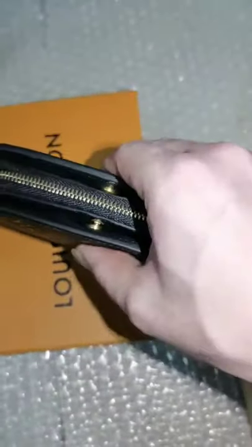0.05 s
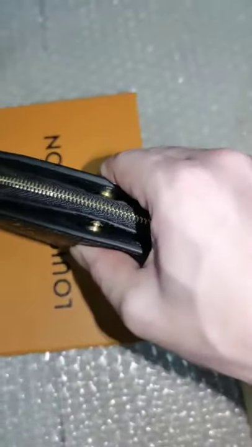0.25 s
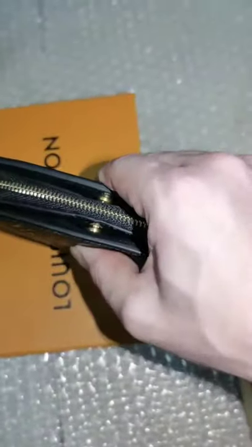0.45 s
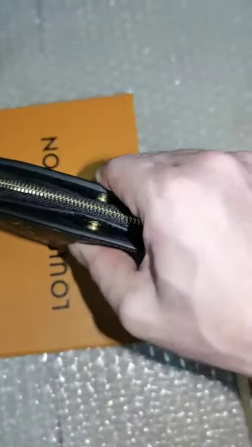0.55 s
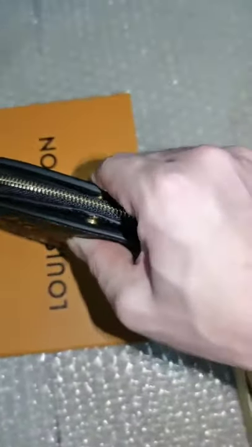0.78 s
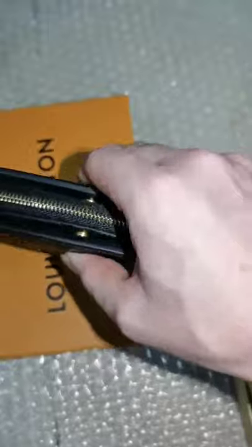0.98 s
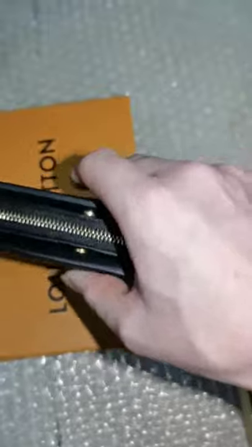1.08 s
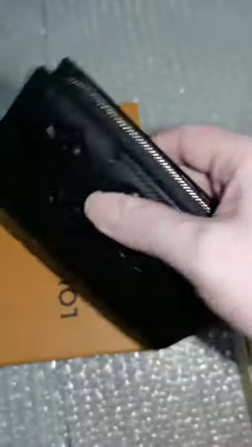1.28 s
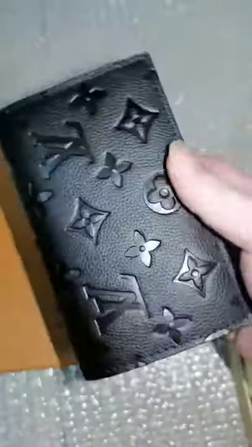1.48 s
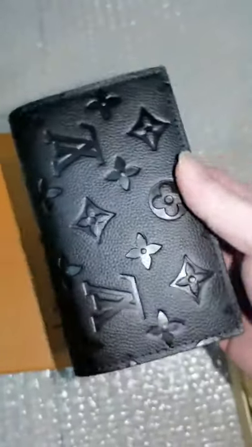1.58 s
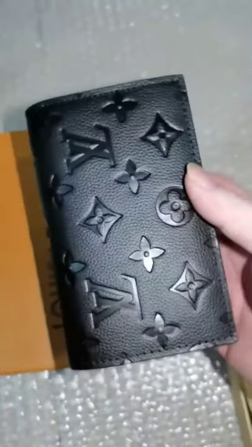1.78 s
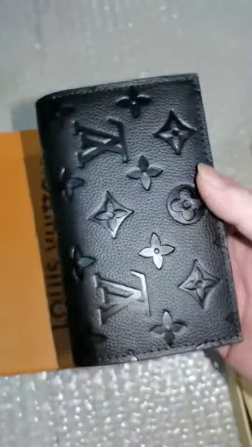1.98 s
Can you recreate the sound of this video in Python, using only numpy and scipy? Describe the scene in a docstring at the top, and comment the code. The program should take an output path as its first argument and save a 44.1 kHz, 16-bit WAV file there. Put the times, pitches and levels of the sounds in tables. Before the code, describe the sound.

Two sharp press studs snap shut in quick succession on a leather purse.

```python
"""Two press studs snap home on a leather purse squeezed shut close to a pair of microphones.
A stud first seats with a dull knock; each snap is a sharp blow that shakes the leather and the socket's
spring and rings the flap, the steel cap and, faintly, the socket. A small bare room rings after them.
The fingers rumble, thump and rustle on the leather, over the room's faint hiss, hum and low drone."""
import sys
import numpy as np
from scipy import signal
from scipy.fft import rfft, irfft, next_fast_len
from scipy.io import wavfile
from scipy.ndimage import map_coordinates

SR = 44100
rng = np.random.default_rng(int(sys.argv[2]) if len(sys.argv) > 2 else 0)


def int16_out(signal):
    """Quantize to a 16-bit WAV file."""
    q = np.round(np.clip(np.atleast_2d(signal).T, -1, 1) * 32767)
    wavfile.write(sys.argv[1], SR, q.astype(np.int16))


N = 90404
TIME_S = np.arange(N) / SR


def press_studs():
    """Each click reaches the left microphone first, returns off table and walls, and rings the socket."""
    # Each row: start in seconds, level in dB, tilt in dB/octave, steel ring, scrape and room gains in dB,
    # room tilt in dB/octave, right microphone's lag in seconds, contact's treble limit in Hz.
    seatings = [(.2517, -13, -3, -34.5, -25, 2.5, -1.1, 0.000078, 2400)]
    snaps = [(0.3644, 6.5, -1.15, -0.5, -6, 3, -1.5, 0.00011, 12000),
             (0.409, 8.5, -0.5, -3.5, -9, -0.5, 3, 0.00013, 15000)]
    # Each row: mode of the metal socket in Hz, level in dB, T60 in seconds.
    socket_modes = [(2239, -60, .45), (2541, -58, .35), (3090, -59, .3), (3467, -56, .3), (3828, -59, .3),
                    (4366, -62, .3)]
    bounce_s, bounce_db, bounce_hz = .0032, -20, 3506  # flap's back wave, inverted, off the table
    bounce = lambda hz: 1 - amp(bounce_db) * delay(bounce_s, hz) / (1 + 1j * hz / bounce_hz)
    out = np.zeros((2, N))
    for events in (seatings, snaps):
        for index, row in enumerate(events):
            start_s, db, tilt_db_oct, steel_db, scrape_db, room_db, room_db_oct, lag_s, contact_hz = row
            t = (np.arange(N) - round(start_s * SR)) / SR
            click = stud_click(t, index, steel_db, scrape_db)
            direct = filtered(click, lambda hz: bounce(hz) * delay(np.array([[0], [lag_s]]), hz))
            tail = amp(room_db) * filtered(room_tail(start_s), lambda hz: tilt(room_db_oct, hz))
            socket = amp(steel_db) * ring(socket_modes, t)
            contact = lambda hz: causal(tilt(tilt_db_oct, hz) / np.sqrt(1 + (hz / contact_hz) ** 6))
            out += amp(db) * filtered(direct + tail + socket, contact)
    return out


def stud_click(t, stud_index, steel_db, scrape_db):
    """A sharp blow at t = 0 and the stud's recoil, with chatter and the ring of flap and cap."""
    # Each row: frequency in Hz, level of the blow in dB.
    blow_spectrum = [(60, -13.5), (200, -4.5), (600, -1), (1500, -4.5), (2700, -3), (3600, -5), (4400, -3),
                     (5000, -10), (5800, -7), (6800, -6), (8600, -8.5), (11000, -6.5), (14000, -4)]
    # Each row: mode of the leather flap in Hz, level in dB struck at the first stud, and at the second.
    flap_levels = [(210, -53, -59.5), (430, -47.5, -64.5), (535, -85, -35.5), (752, -29.5, -34.5),
                   (1195, -46.5, -45.5), (1497, -30.5, -37), (2300, -30.5, -24), (2750, -58, -41),
                   (3800, -49, -33), (4233, -18.5, -34)]
    # Each row: mode of the steel cap in Hz, level in dB, T60 in seconds.
    cap_modes = [(6350, -31.5, 0.011), (6840, -31, 0.0082), (9060, -30.5, 0.01), (9910, -32.5, 0.0047),
                 (10630, -32.5, .012)]
    recoil_s, recoil_db, recoil_hz = .00028, -7, 5500
    recoil = lambda hz: 1 - amp(recoil_db) * delay(recoil_s, hz) / (1 + (hz / recoil_hz) ** 2)
    force = filtered(t == 0, recoil) + scrape_and_chatter(t, scrape_db)
    blow = filtered(force, lambda hz: causal(amp(along(blow_spectrum, hz))))
    flap_t60_s = .018  # at 1 kHz; higher modes die sooner
    flap_modes = [(hz, dbs[stud_index], flap_t60_s * (1000 / hz) ** .45) for hz, *dbs in flap_levels]
    return blow + ring(flap_modes, t) + amp(steel_db) * ring(cap_modes, t)


def scrape_and_chatter(t, scrape_db):
    """The stud scrapes past the spring; after the blow the leather shudders and the spring rattles."""
    rise_s, shudder_t60_s, rattle_t60_s = .00046, .026, .016
    low_cut_hz, split_hz = 1300, 4300
    scrape = amp(scrape_db) * burst((t < 0) * np.exp(-abs(t) / rise_s), scatter=.94)
    shudder = amp(1.5) * burst((t > 0) * amp(-60 * abs(t) / shudder_t60_s), scatter=0)
    rattle = amp(4.5) * burst((t > 0) * amp(-60 * abs(t) / rattle_t60_s), scatter=.94)
    lowpass = lambda hz: 1 / (1 + (hz / split_hz) ** 8)
    chatter = filtered(shudder, lowpass) + filtered(rattle, lambda hz: 1 - lowpass(hz))
    return filtered(scrape + chatter, lambda hz: 1j * hz / (low_cut_hz + 1j * hz))


def spring_clicks():
    """The spring clicks against the stud as it spreads and closes again."""
    # Each row: peak time in seconds, level in dB, centre in Hz, half-length in seconds.
    clicks = [(.3708, -37, 10300, .0012), (.4081, -27, 9000, .0004), (.4131, -25, 10700, .0012)]
    return sum(noise_swell(*row, width_ratio=.14) for row in clicks)


def room_tail(start_s):
    """The room's diffuse answer to a click; treble dies first."""
    # Each row: frequency in Hz, level in dB.
    tail_spectrum = [(100, -29), (200, -6), (340, -8.5), (450, 1.5), (560, -4), (750, -6), (1500, -8),
                     (3200, -9.5), (4500, -12), (5500, -16.5), (6800, -30), (9000, -13.5), (12600, -20.5),
                     (13200, -51)]
    # Each row: frequency in Hz, T60 in seconds.
    decay_times = [(200, 1), (1000, 0.73), (3500, 0.62), (7000, 0.44), (12000, 0.39)]
    onset_s = .01
    hz, frame_s, spectra = signal.stft(shaped_noise(tail_spectrum), SR, nperseg=256)
    t60_s = along(decay_times, hz)[:, None]
    equal_energy = np.sqrt(2 * np.log(1000) / (t60_s * SR))
    decay = amp(-60 * np.maximum(frame_s - start_s, 0) / t60_s) * equal_energy
    tail = signal.istft(spectra * decay, SR, nperseg=256)[1][:, :N]
    return tail * (1 - np.exp(-np.maximum(TIME_S - start_s, 0) / onset_s))


def handling():
    """Moving hands rumble and fingers thump softly on the purse; one short thump at 0.2527 s adds body to the
    first stud's dull knock as it seats."""
    # Each row: frequency in Hz, relative level in dB.
    rumble_spectrum = [(15, -8), (42, -0.5), (75, -4), (120, -9.5), (180, -14.5), (300, -27.5), (700, -60),
                       (2000, -86)]
    # Each row: time in seconds, level in dB.
    rumble_levels = [(0, -53), (.17, -45.5), (.28, -39.5), (.38, -62.5), (.5, -51.5), (.68, -48.5),
                     (.78, -54), (1.0, -58.5), (1.15, -58.5), (1.25, -49), (1.33, -58.5), (1.44, -45.5),
                     (1.53, -55.5), (1.61, -58), (1.79, -46.5), (1.84, -49), (1.92, -59), (2.05, -45.5)]
    # Each row: centre time in seconds, level in dB, pitch in Hz, half-length in seconds,
    # left minus right in dB.
    thumps = [(0.212, -50, 90.5, 0.0044, -55.5), (0.228, -30.5, 142, 0.0031, -20),
              (0.231, -35, 57.4, 0.002, -29), (.2527, -35, 300, .0018, 1), (0.618, -42.5, 71, 0.012, -5),
              (0.633, -39.5, 150, 0.0047, -18), (1.214, -53.5, 105, 0.012, -26.5),
              (1.378, -42, 88, 0.0089, -8.5), (1.524, -44.5, 68, 0.0046, -19),
              (1.829, -46, 68, 0.011, -9.5)]
    out = level(rumble_levels) * unit(shaped_noise(rumble_spectrum))
    for centre_s, db, hz, half_s, pan_db in thumps:
        t = TIME_S - centre_s
        gains = amp([[db + pan_db / 2], [db - pan_db / 2]])
        out += gains * np.exp(-(t / half_s) ** 2) * np.sin(2 * np.pi * hz * t)
    return out


def leather_rustle():
    """Skin brushes leather in small catches; the leather ticks as it bends."""
    # Each row: peak time in seconds, level in dB, centre in Hz, half-length in seconds.
    rubs = [(0.08, -56.5, 328, 0.14), (0.29, -64.5, 1660, 0.1), (0.76, -64.5, 9400, 0.011),
            (1.2, -70.5, 2300, 0.055), (1.74, -69.5, 1103, 0.043)]
    ticks = [(.119, -57, 1180, .003), (1.1525, -54.5, 2400, .0015), (1.853, -62, 1300, .002)]
    grains_per_s, grain_db = 260, 3
    wander = map_coordinates(rng.standard_normal(N), [TIME_S * grains_per_s])
    catches = unit(amp(grain_db * wander))
    rubbing = catches * sum(noise_swell(*row, width_ratio=.52) for row in rubs)
    return rubbing + sum(noise_swell(*row, width_ratio=.52) for row in ticks)


def room_tone():
    """Soft hiss, faint hum and a low drone that swells and fades."""
    # Each row: frequency in Hz, level in dB.
    air_spectrum = [(30, -63.5), (250, -47), (340, -50.5), (650, -54.5), (1200, -58), (2000, -60.5),
                    (4000, -64.5), (5500, -71), (8000, -66), (12700, -69), (13500, -78)]
    # Each row: centre in Hz, half-width in Hz, level in dB.
    hum_bands = [(439, 22.3, -68), (1207, 60, -77.5), (1683, 220, -76), (2550, 46, -83)]
    # Each row: time in seconds, gain in dB.
    air_gains = [(0, 2.5), (.12, 3.5), (.3, 3.5), (.6, -1.5), (.85, 0), (1.3, -0.5), (1.55, -1), (1.8, 0.5),
                 (2.05, 0)]
    hum_gains = [(0, 4), (.7, 3), (1.05, -2), (1.5, -6), (1.65, 0.5), (2.05, 0)]
    drone_gains = [(0, 7), (.25, 9.5), (.5, -1), (.85, -1.5), (1.0, 6), (1.06, 5), (1.09, -17.5), (1.25, 2),
                   (1.6, -7.5), (1.92, -4.5), (2.05, -17)]
    hiss = level(air_gains) * shaped_noise(air_spectrum)
    hum = level(hum_gains) * sum(wavering_tone(*row) for row in hum_bands)
    drone = level(drone_gains) * wavering_tone(centre_hz=204.6, half_width_hz=11.5, db=-58.5)
    return hiss + hum + drone


def wavering_tone(centre_hz, half_width_hz, db):
    """Noise in a band narrow enough to have a pitch."""
    peak = lambda hz: 1 / (1 + ((hz - centre_hz) / half_width_hz) ** 2)
    return amp(db) * unit(filtered(diffuse_noise(), peak))


def noise_swell(peak_s, db, centre_hz, half_s, width_ratio):
    """A Gaussian swell of band noise; width is a share of the centre frequency."""
    bell = lambda hz: np.exp(-((hz / centre_hz - 1) / width_ratio) ** 2 / 2)
    envelope = np.exp(-((TIME_S - peak_s) / half_s) ** 2)
    return amp(db) * envelope * unit(filtered(diffuse_noise(), bell))


def diffuse_noise():
    """White stereo noise, partly alike in the bass, unrelated in the treble, louder on the right."""
    # Each row: frequency in Hz, left-right correlation.
    coherence = [(60, 0.21), (130, 0.42), (280, 0.91), (600, 0.3), (1300, 0), (13000, 0)]
    pan_db = -2.5
    angle = lambda hz: np.arccos(np.clip(along(coherence, hz), -1, 1)) / 2
    weights = lambda hz: np.array([np.cos(angle(hz)), np.sin(angle(hz))])
    mid, side = filtered(rng.standard_normal((2, N)), weights)
    return np.array([mid + side, mid - side]) * amp([[pan_db / 2], [-pan_db / 2]])


def shaped_noise(spectrum):
    """Diffuse noise coloured by (Hz, dB) points."""
    return filtered(diffuse_noise(), lambda hz: amp(along(spectrum, hz)))


def burst(envelope, scatter):
    """Enveloped noise of energy 1, partly scattered on its way to each microphone."""
    x = envelope * (rng.standard_normal(N) + scatter * rng.standard_normal((2, N)))
    return x / np.linalg.norm(x, axis=1, keepdims=True)


def ring(modes, t):
    """Damped modes struck at t = 0."""
    partials = (amp(db - 60 * abs(t) / t60_s) * np.cos(2 * np.pi * hz * t) for hz, db, t60_s in modes)
    return (t >= 0) * sum(partials)


def filtered(x, response):
    """x through a complex frequency response."""
    size = 2 * next_fast_len(N)
    return irfft(rfft(x, size) * response(np.fft.rfftfreq(size, 1 / SR)), size)[..., :N]


def causal(gain):
    """Minimum-phase response with this gain."""
    cepstrum = irfft(np.log(np.maximum(gain, 1e-6)))
    half = len(cepstrum) // 2
    cepstrum[1:half] *= 2
    cepstrum[half + 1:] = 0
    return np.exp(rfft(cepstrum))


def delay(lag_s, hz):
    """Response of a pure delay."""
    return np.exp(-2j * np.pi * hz * lag_s)


def tilt(db_per_octave, hz):
    """Gain sloping about 1.5 kHz, flat below 500 Hz."""
    return amp(db_per_octave * np.log2(np.maximum(hz, 500) / 1500))


def along(points, hz):
    """(Hz, value) points read on a log axis."""
    knots_hz, values = np.transpose(points)
    return np.interp(np.log(hz + 1), np.log(knots_hz + 1), values)


def level(points):
    """(s, dB) points as one gain per sample."""
    return amp(np.interp(TIME_S, *np.transpose(points)))


def amp(db):
    """Decibels to gain."""
    return 10 ** (np.asarray(db) / 20)


def unit(x):
    """Scale to rms 1."""
    return x / np.sqrt(np.mean(x ** 2) + 1e-20)


def scene():
    """Studs, hands and room together."""
    return press_studs() + spring_clicks() + handling() + leather_rustle() + room_tone()


def record(dry):
    """Each microphone adds its own treble peak; high peaks are rounded and the top end rolls off."""
    # Each row: frequency in Hz, gain in dB.
    left_mic = [(500, -1), (1300, 3.5), (4000, 2.5), (7000, -3), (9200, 4.5), (10200, -8), (12500, -10),
                (15000, -22.5)]
    right_mic = [(500, -1.5), (1300, 3), (4000, 3), (7000, -1.5), (8700, -6.5), (10200, 3.5), (12400, -1.5),
                 (13600, -3), (15500, -5)]
    roll_off = [(12300, 0), (13300, -8.5), (14300, -33), (15500, -40.5)]
    ceiling, knee, top_hz = .87, 2.2, 15500
    mics = lambda hz: np.array([causal(amp(along(mic, hz))) for mic in (left_mic, right_mic)])
    coloured = filtered(dry, mics)
    rounded = coloured / (1 + abs(coloured / ceiling) ** knee) ** (1 / knee)
    return filtered(rounded, lambda hz: amp(along(roll_off, hz)) * (hz < top_hz))


dry = scene()
out = record(dry)
int16_out(out)
```